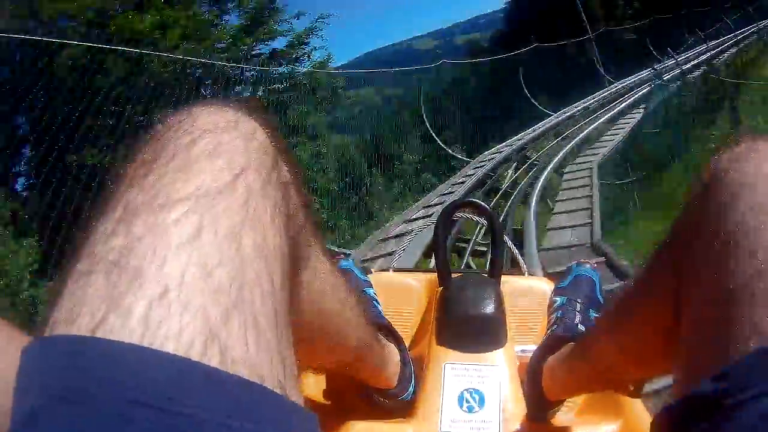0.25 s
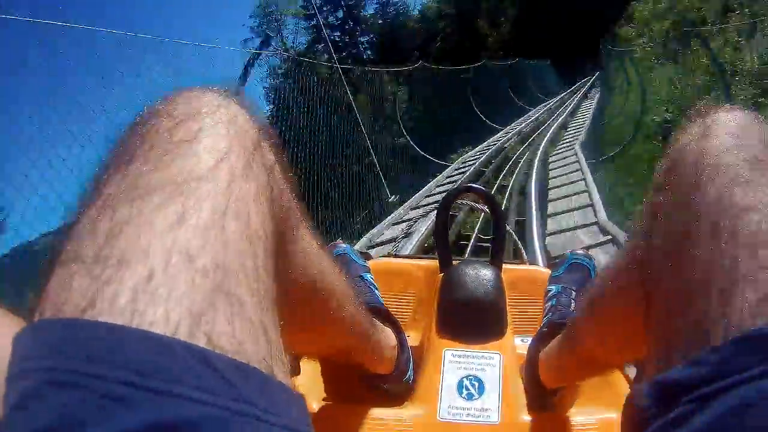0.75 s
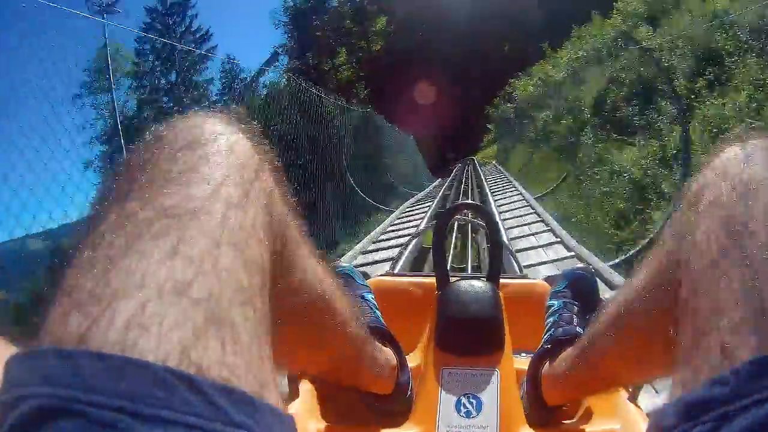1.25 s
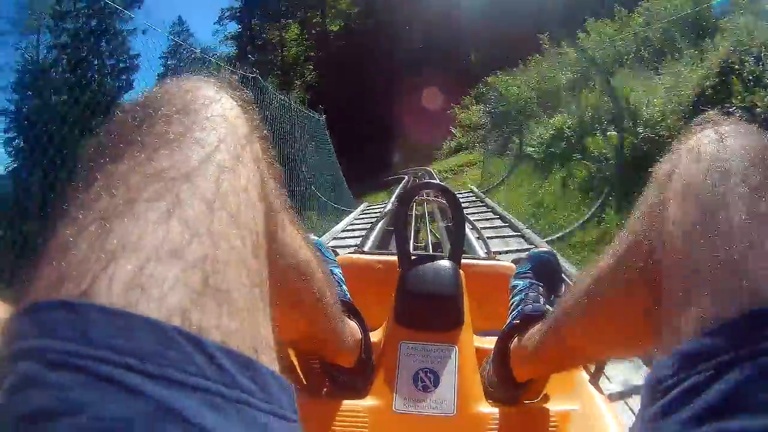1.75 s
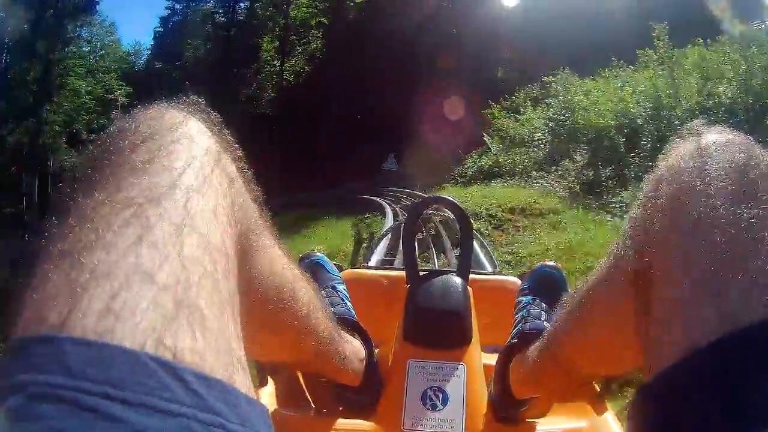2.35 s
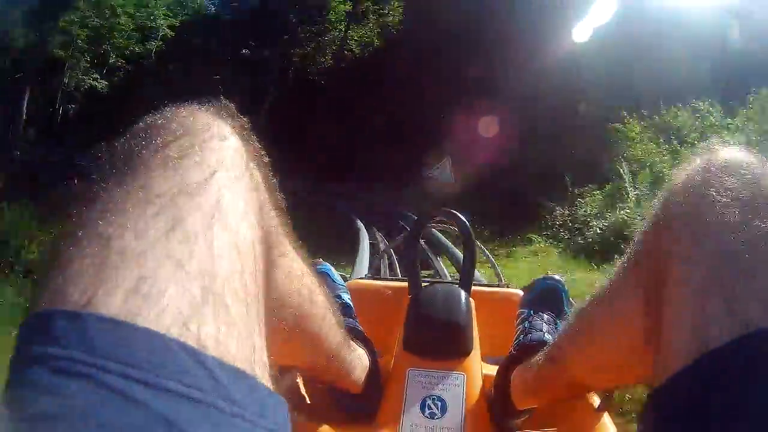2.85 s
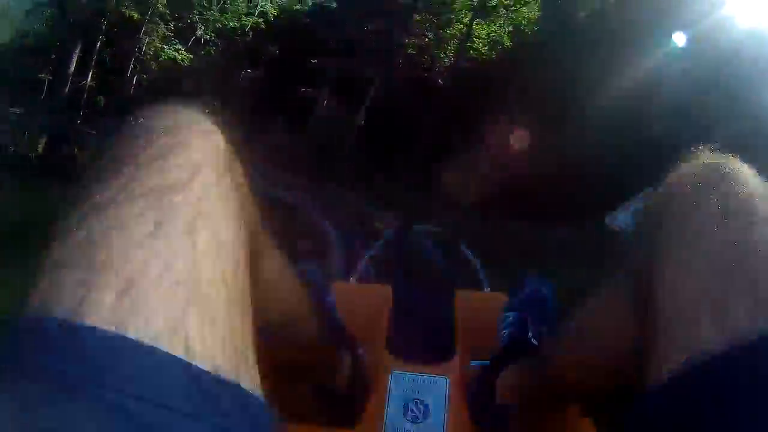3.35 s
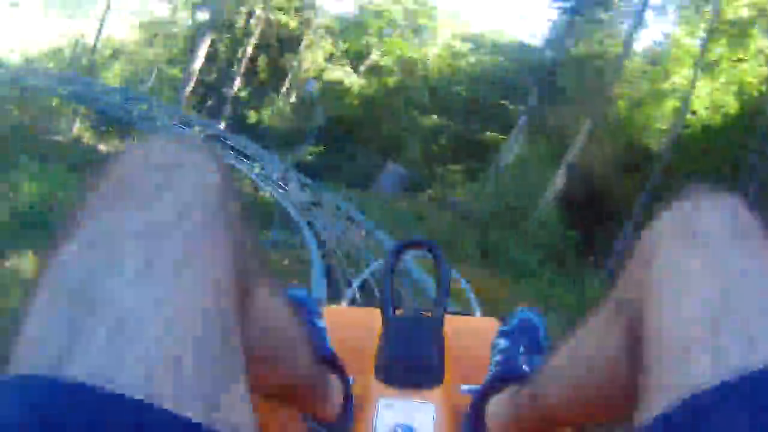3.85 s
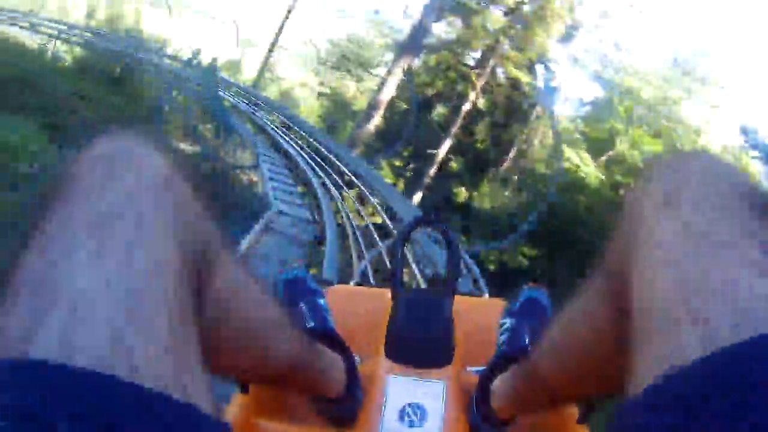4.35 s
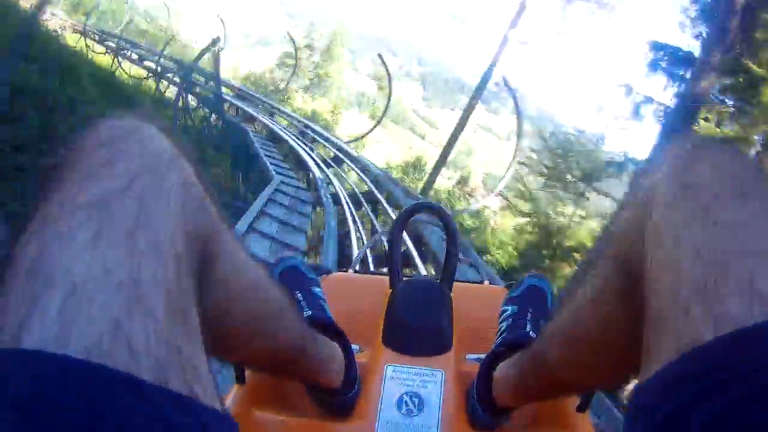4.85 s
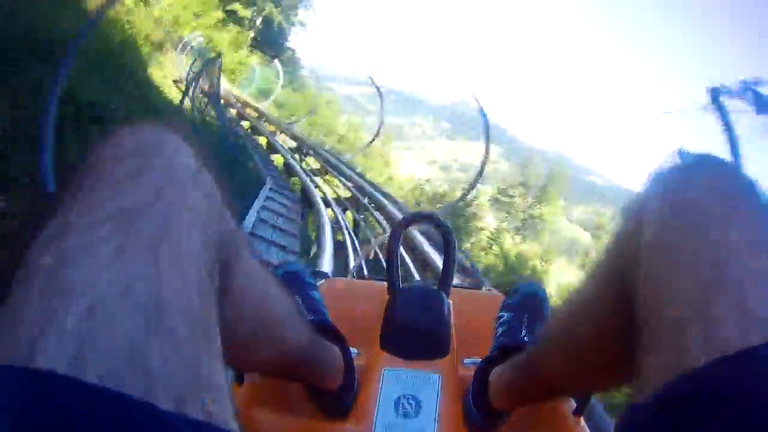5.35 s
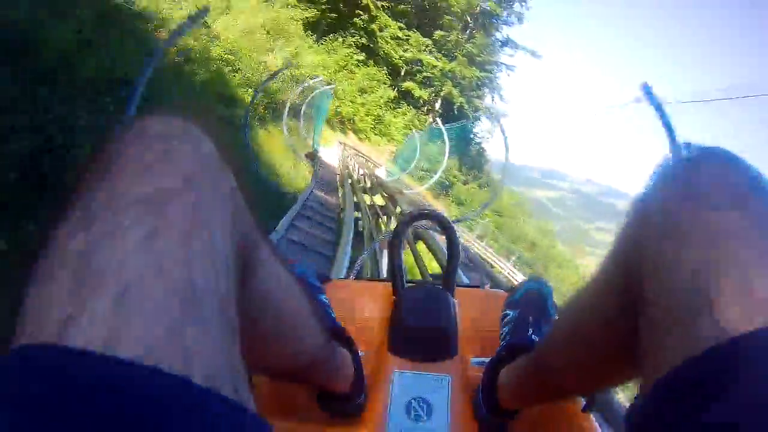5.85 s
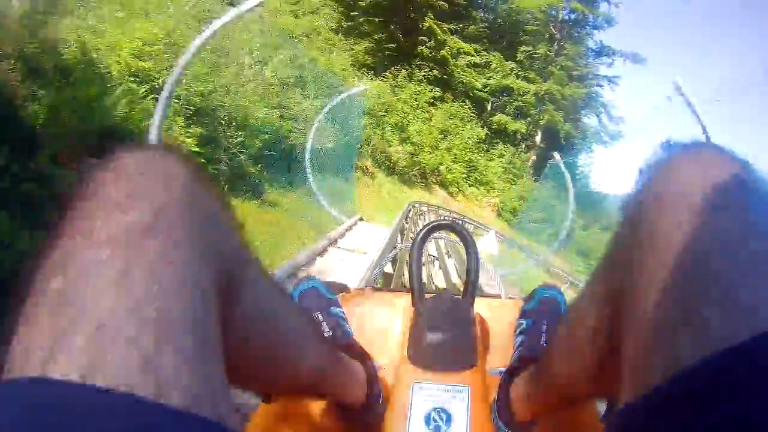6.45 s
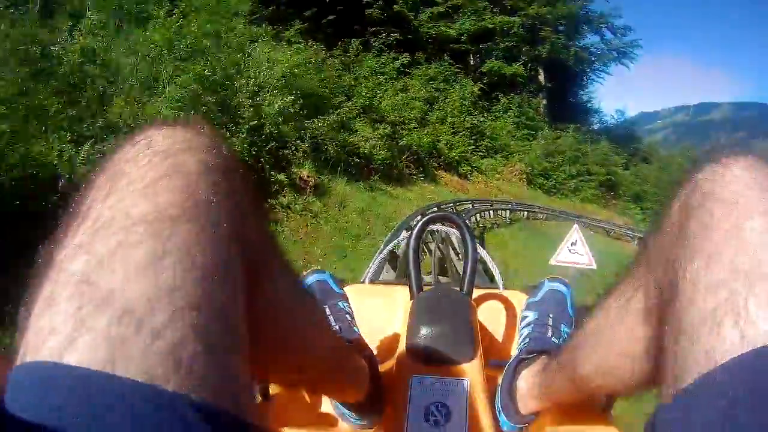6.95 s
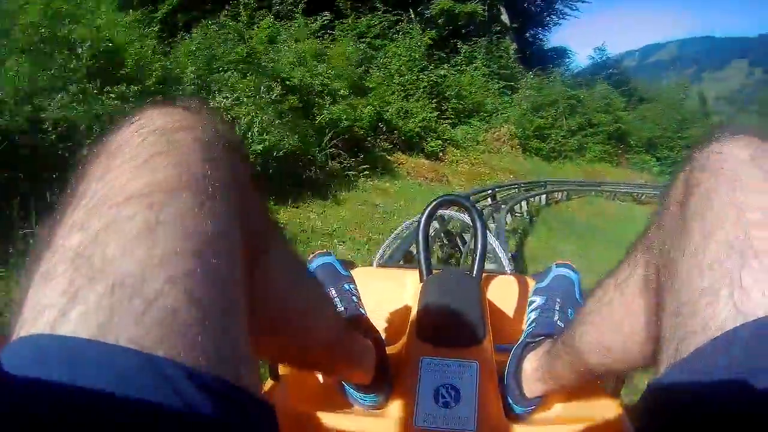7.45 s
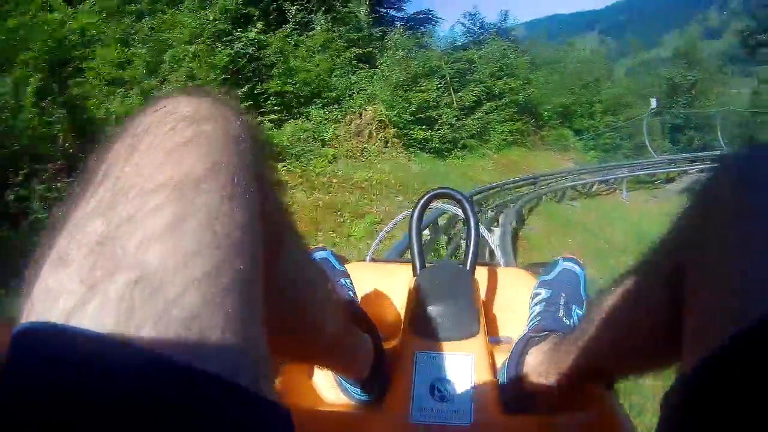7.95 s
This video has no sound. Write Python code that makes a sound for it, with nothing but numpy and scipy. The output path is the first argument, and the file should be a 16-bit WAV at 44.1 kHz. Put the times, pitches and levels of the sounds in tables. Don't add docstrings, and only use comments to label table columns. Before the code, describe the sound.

Continuous gritty wheel rumble with a nasal, hollow plastic resonance and faint singing tones. Early squeaks and a tiny whistle give way to violent clacks just after one second, with a sudden low hum. The middle is calmer and scraping, then clicks and ticks come in groups until a heavy knock at six seconds. Headwind thuds against the enclosed close microphone outdoors; the end is gentler, with soft scuffs and faint hum.

```python
import sys
import numpy as np
from scipy import signal
from scipy.fft import rfft, irfft, next_fast_len
from scipy.io import wavfile
from scipy.ndimage import uniform_filter1d, map_coordinates

SR = 44100
rng = np.random.default_rng(int(sys.argv[2]) if len(sys.argv) > 2 else 0)


def transcribe(u):
    v = np.clip(np.atleast_2d(u).T, -1, 1)
    q = np.round(v * 32767).astype(np.int16)
    wavfile.write(sys.argv[1], SR, q)


def invert_db(level):
    return 10 ** (np.asarray(level, dtype=float) / 20)


N = 361179

# (frequency [Hz], level [dB per Hz])
HISS_SPECTRUM = [(1470, -7.5), (2500, -6), (3560, -16), (4120, -13), (4800, -11), (5070, -11),
                 (11200, -14.5), (14600, -15.5), (15700, -22.5)]
HISS_DB = -66

# (time [s], load [dB])
WHEEL_LOAD = [(0, 10.5), (.3, 3.5), (.6, 1), (.9, -1.5), (1.2, 6), (1.65, 2), (2.0, -0.5), (2.4, .5),
              (2.75, 1.5), (3.2, -2.5), (3.6, -3.5), (4.0, -1), (4.7, 2), (5.4, 2), (5.9, -.5), (6.6, 0),
              (7.2, -2), (8.19, -0.5)]
# (time [s], extra load [dB], extra scrape [dB], half length [s])
ROUGH_SPOTS = [(0.142, 4, 4, 0.018), (0.623, 1, 3, 0.033), (1.122, 4.5, 4, 0.057), (1.215, 12, 5, 0.021),
               (1.437, -1.5, 6.5, 0.043), (1.69, 6, 6.5, 0.066), (1.807, 3, 4, 0.041),
               (2.546, 3, 0.5, 0.044), (2.797, 2, 4, 0.1), (3.36, 5.5, 2, 0.069), (3.703, 12, 9, 0.086),
               (4.283, 3, 1.5, 0.035), (5.328, 3.5, 2, 0.056), (5.903, 7.5, 2, 0.031), (6.067, 2, 3, 0.11),
               (6.632, 6, 4, 0.029), (6.773, 10, -1, 0.032), (7.41, -11, 9, 0.021), (7.721, 4.5, 6, 0.036),
               (8.15, 2.5, 0.5, 0.081)]
# (frequency [Hz], level [dB per Hz])
BODY_SPECTRUM = [(53, -20), (90, -2.5), (125, -11.5), (236, -12), (433, -14), (587, -19.5), (778, -17),
                 (896, -23), (1200, -21.5), (1560, -44), (2640, -120)]
# (frequency [Hz], width [Hz], level [dB])
ROLL_MODES = [(789, 33, -8), (1228, 315, -8.5), (1360, 60, 2.5), (1472, 103, -2), (1938, 260, -6.5),
              (2407, 210, -12)]
# (frequency [Hz], width [Hz], level [dB])
SCRAPE_MODES = [(2640, 490, 4.5), (3350, 1270, -0.5), (4150, 327, 4.5), (5140, 110, -6), (6020, 420, -8),
                (8040, 290, -14.5), (10800, 730, -11)]
BODY_DB, ROLL_DB, SCRAPE_DB = -48, -53.5, -64.5
BODY_DB_PER_DB, SCRAPE_DB_PER_DB = 0.46, 0.4
# (frequency [Hz], level at 0 dB load [dB], wander [share], flicker [dB])
SINGING_LINES = [(1351, -62.5, .012, 5.5), (1490, -63, .012, 2.5), (1900, -69.5, 0.018, 3),
                 (4230, -74.5, .022, 3.5)]

# (time [s], level [dB])
HEADWIND = [(0.0, -37), (0.11, -32), (0.2, -36.5), (0.64, -34), (0.98, -41), (1.09, -31), (1.41, -40),
            (1.8, -35), (1.85, -44.5), (3.58, -45), (3.74, -34), (3.88, -41), (5.36, -38), (5.43, -32),
            (5.61, -36.5), (6.07, -40.5), (6.2, -43), (8.19, -42.5)]
# (frequency [Hz], level [dB per Hz])
BUFFET_SPECTRUM = [(4, -9), (10, 0), (18, 0), (30, -8), (55, -12), (90, -20), (170, -29), (600, -100)]
WIND_DB_PER_JOLT_DB = 0.26
# (time [s], peak [dB], width [ms])
GUST_PUSHES = [(0.123, -14.5, 6.1), (.836, -26.5, 3), (1.041, -18.5, 4), (1.107, -16.5, 6.5),
               (2.541, -20.5, 0.64), (2.63, -31, 5.7), (4.08, -26, 1.2), (4.26, -23, 9.8),
               (5.441, -26, 2.3), (5.597, -25.5, 3), (6.682, -19.5, 3.9), (7.542, -27, 3.5),
               (7.739, -28, 3.6), (7.87, -33, 3.7), (8.069, -24, 4.9)]
# (time [s], peak [dB], width [ms])
GUST_SUCKS = [(0.313, -23, 3.9), (.347, -26.5, 4.4), (.532, -21.5, 3.1), (0.609, -17.5, 7.5),
              (0.64, -19, 6.3), (1.396, -19.5, 3.2), (1.463, -21, 2), (1.603, -23.5, 2.15), (1.699, -23, 2),
              (2.522, -24.5, 0.65), (3.057, -29, 5.6), (3.701, -21, 1.75), (3.976, -29.5, 3.5),
              (5.885, -26.5, 2.8), (6.738, -24.5, 2.3)]

# (time [s], peak [dB], bright part [dB], length [s])
MOUNT_SCUFFS = [(0.009, -28.5, -19, 0.015), (0.058, -31, -24, 0.015), (1.542, -40, -8.5, 0.016),
                (6.412, -39.5, -11, 0.023), (1.077, -29, -16, 0.011), (1.12, -29, -18, 0.016),
                (1.16, -21.5, -16.5, 0.013), (1.733, -44, -20, 0.022), (2.708, -41, -9, 0.036),
                (3.62, -35, -21, 0.025), (3.65, -36, -16, .02), (3.667, -35, -14, 0.02),
                (3.684, -34, -15, .014), (3.7, -30, -12.5, 0.023), (4.65, -39, -18, 0.026),
                (5.904, -36, -19, 0.047), (6.59, -34, -16, 0.015), (6.622, -36, -22, 0.018),
                (6.684, -34.5, -16.5, 0.017), (6.763, -34, -17, 0.016), (6.823, -34, -17, 0.032),
                (7.396, -36, -20, 0.03)]
# (time of top [s], frequency [Hz], top [dB], rise [s], fall [s])
SQUEAL_BURSTS = [
    (.065, 1395, -37, 0.045, 0.025),
    (.159, 1372, -43, 0.04, 0.024),
    (.215, 1420, -43, .03, 0.12),
    (.335, 1399, -46, 0.03, .015),
    (.03, 1380, -44, .04, .03),
    (7.498, 1470, -46, 0.02, 0.015),
]
SQUEAL_REST_DB = -70
# (time of top [s], frequency [Hz], top [dB], rise [s], fall [s])
FLANGE_WHISTLE = [
    (.31, 1038, -53, 0.032, 0.092),
    (.35, 1086, -56, .02, .02),
    (.364, 1040, -52, .02, .009),
]
# (time of top [s], frequency [Hz], top [dB], rise [s], fall [s])
HUM_SWELLS = [
    (1.386, 87.1, -30.5, 0.016, 0.097),
    (2.5, 82.4, -40.5, 1.2, 0.48),
    (4.436, 78, -41.5, 0.18, 0.21),
    (4.82, 79.8, -40.5, 0.13, 0.1),
    (6.03, 78.5, -42, 0.14, .1),
    (6.67, 77.2, -43.5, 0.81, .26),
    (7.04, 76, -45.5, 0.14, 0.17),
    (7.3, 77.1, -46, 0.097, 0.92),
    (8.19, 79.95, -42, 1.04, 0.28),
]
SWELL_DROP_DB = 12
# (time of top [s], frequency at top [Hz], top [dB], rise [s])
PORT_WHOOPS = [
    (3.58, 145, -46, .2),
    (6.7, 190, -50, .1),
    (7.54, 150, -47, .08),
]
WHOOP_OCTAVES_PER_S, WHOOP_FALL_S, WHOOP_RISE_DB, WHOOP_FALL_DB = 5.64, 0.059, 10, 10

# (frequency [Hz], level [dB], t60 [s])
THUMP_MODES = [(106, 4, 0.021), (200, 2, 0.016), (309, -10, 0.04)]
# (frequency [Hz], level [dB], t60 [s])
PANEL_MODES = [(495, -3, 0.012), (746, -1.5, 0.012), (940, 8.5, 0.0067)]
# (frequency [Hz], level [dB], t60 [s])
RING_MODES = [(1212, -4.5, 0.025), (1367, 6, 0.013), (1490, 1.5, 0.011)]
# (frequency [Hz], level [dB], t60 [s])
UPPER_MODES = [(1892, 1, 0.015), (2030, -6.5, 0.013), (2370, -12, 0.02)]
# (frequency [Hz], level [dB], t60 [s])
CRACK_MODES = [(2740, 1.5, 0.0061), (3344, -1.5, 0.0069), (3820, -1, 0.0091), (4310, 2, 0.0058),
               (5470, -8.5, 0.0055), (6500, -12.5, 0.0051), (7930, -20.5, 0.0049)]
# (time [s], peak [dB], weight [dB], brightness [dB])
RAPS = [
    (.338, -25.5, 0, 3),
    (.848, -27, 4, 2.5),
]
BUMPS = [
    (.451, -49, 5, -3),
    (1.461, -30.5, -1, -10),
    (1.758, -44, 10.5, -2),
    (2.521, -39, 4, 10.5),
    (6.735, -45, 3, -7),
]
BLOWS = [
    (1.209, 1.8, -3, 10),
    (1.7923, -9, 1, 5),
]
SLAMS = [
    (1.3031, -7, 0.38, 0.74),
    (6.0321, -8.5, -1, -0.75),
]
CLICKS = [
    (1.318, -32.5, -6, 6),
    (1.334, -45, -6, 0),
    (3.792, -31, 3.5, -1.5),
    (3.82, -48, 0, 1),
    (3.923, -51, 0, -2),
    (3.989, -41, -5, -5),
    (4.08, -37, 4, -7),
    (4.119, -50, -6, 2),
    (4.236, -48, -6, -1),
    (6.019, -37, 6, 1),
]
TICKS = [
    (2.54, -36, -3, 1.5),
    (3.752, -25, 3, 4.5),
    (3.757, -27.5, 8.5, -5),
    (4.758, -22.5, -1, 1),
    (5.283, -15, 0.5, 2.5),
    (5.421, -24.5, 3.5, 3),
    (5.556, -26, 3.5, 4.5),
    (5.972, -32, 11, -3.5),
]
TOCKS = [
    (4.775, -26, 3.5, 4.5),
    (5.324, -25, 3, 1),
    (5.463, -22.5, 1, -1),
    (6.027, -31, -4, -2.5),
    (6.068, -39, -10, -10),
]
# (thump [dB], panel [dB], upper ring [dB], crack [dB], brightness in upper ring [share])
RAP_RINGS = (-19, -20, -5.5, -31, -0.5)
BUMP_RINGS = (-6, -4.5, -21, -23, 1.27)
BLOW_RINGS = (-12.5, -21.5, -15, -28, 0.18)
SLAM_RINGS = (-11.5, -25, -11.5, -35, 2.8)
CLICK_RINGS = (-6, -14, -9, -7, 1.5)
TICK_RINGS = (-25.5, -15, -21, -11, 2.3)
TOCK_RINGS = (-10.5, -3, -1.5, -12.5, 0.44)
# (panel modes [dB], ring modes [dB], crack modes [dB])
BUMP_FAVOURS = ([1.7, 0.1, -2], [0.1, 0.1, 0.1], [0.1] * 7)
BLOW_FAVOURS = ([.1, 2.6, 1], [-4.5, 0.1, -1], [-4, 7.5, -4, -15, -6, -11, -11])
SLAM_FAVOURS = ([-4, 0.93, .1], [-8, 0.1, .1], [2, -20, 3, -6, 2, -9, -13])
CLICK_FAVOURS = ([.1, .1, .1], [-4, -3, 3], [3.5, 2, -2, -14, -11, -14, -18])
TICK_FAVOURS = ([-10, -1.2, 0.1], [-0.5, -4, 5.2], [-13, -0.5, -8, -8, 1, -5, 8])
TOCK_FAVOURS = ([4.4, -1, -10], [0.1, 2, -14], [3.5, 2.5, -11, 3, 0, 2, -11])
HARD_BLOW_DB = -12
HARD_RISE_S, LIGHT_RISE_S = 0.00039, 0.00033
HARD_DAMPING, HARD_GAIN_DB = 0.68, 4
# (frequency [Hz], level [dB], t60 [s])
LID_MODES = [(574, -12.5, 0.055), (780, -16, 0.068), (1241, -2, 0.072), (1895, -12, .07),
             (2420, -19, 0.045), (2820, -14, .03)]
# (time [s], level [dB])
LID_RINGS = [
    (1.21, -17.5),
    (1.304, -25),
    (1.793, -24.5),
    (6.033, -29),
]
REBOUND_HZ, REBOUND_DB, REBOUND_T60_S = 160, 1.5, 0.039

# (start [s], end [s])
TREBLE_GAPS = [(.318, .346), (.83, .859), (1.151, 1.21), (1.278, 1.306), (1.791, 1.818), (3.743, 3.771),
               (4.734, 4.795), (5.279, 5.338), (5.406, 5.466), (5.534, 5.562), (5.95, 6.035)]
# (frequency [Hz], threshold [spreads])
TREBLE_DROPOUTS = [(9000, 3.2), (12200, 2.3), (12600, .9), (15400, 1.05), (15750, .2)]


def unit(x):
    return x / np.sqrt(np.mean(x ** 2) + 1e-20)


def curves(rows):
    time_s, *columns = np.transpose(rows)
    return [np.interp(np.arange(N) / SR, time_s, column) for column in columns]


def wobble(rate_hz):
    knots = rng.standard_normal(int(N * rate_hz / SR) + 4)
    return map_coordinates(knots, [np.arange(N) * rate_hz / SR])


def filtered(x, response):
    size = next_fast_len(N + SR // 2)
    hz = np.fft.rfftfreq(size, 1 / SR)
    return irfft(rfft(x, size) * response(hz), size)[:N]


def colour(points):
    point_hz, level_db = np.transpose(points)
    return lambda hz: invert_db(np.interp(np.log(hz + 1), np.log(point_hz + 1), level_db))


def resonances(modes, hz):
    total = 0
    for k, (centre_hz, width_hz, db) in enumerate(modes):
        loss = 1j * hz * width_hz
        total = total + (-1) ** k * invert_db(db) * loss / (centre_hz ** 2 - hz ** 2 + loss)
    return total


def roll_response(hz):
    return resonances(ROLL_MODES, hz) / (1 + (hz / 2700) ** 6)


def scrape_response(hz, top_order):
    low_loss = 1 + (2300 / (hz + 1)) ** 4
    high_loss = 1 + (hz / 12000) ** top_order
    return resonances(SCRAPE_MODES, hz) / low_loss / high_loss


def rough(patchy_db, flutter_db, rate_hz):
    spectra = signal.stft(rng.standard_normal(N), nperseg=512)[2]
    across_hz = uniform_filter1d(rng.standard_normal(spectra.shape), 5, 0)
    patches = unit(uniform_filter1d(across_hz, 8, 1))
    noise = signal.istft(spectra * invert_db(patchy_db * patches), nperseg=512)[1][:N]
    return noise * invert_db(flutter_db * wobble(rate_hz))


def jolts():
    spot_s, load_db, scrape_db, half_s = np.transpose(ROUGH_SPOTS)
    t = np.arange(0, N, 256) / SR
    bell = np.exp(-((t[:, None] - spot_s) / half_s) ** 2)
    return curves(np.c_[t, bell @ load_db, bell @ scrape_db])


def swells(rows, rest_db=-90):
    top_s, hz, db, rise_s, fall_s = np.transpose(sorted(rows))
    t = np.arange(0, N, 128) / SR
    since_s = t[:, None] - top_s
    distance = np.where(since_s < 0, -since_s / rise_s, since_s / fall_s)
    level_db = (db - SWELL_DROP_DB * distance).max(axis=1)
    return [np.c_[t, np.interp(t, top_s, hz), np.maximum(level_db, rest_db)]]


def tone(tables, waver, rate_hz, flutter_db):
    out, drift, flutter = np.zeros(N), wobble(rate_hz), wobble(rate_hz)
    for rows in tables:
        s, hz, db = np.transpose(rows)
        first = int(max(s[0] - 0.01, 0) * SR)
        last = min(int((s[-1] + 0.005) * SR), N)
        i = np.arange(first, last)
        fade = np.clip(np.minimum(i - i[0], i[-1] - i) / (0.016 * SR), 0, 1)
        pitch_hz = np.interp(i / SR, s, hz) * (1 + waver * drift[i])
        level = invert_db(np.interp(i / SR, s, db) + flutter_db * flutter[i])
        out[i] += np.sqrt(2) * fade * level * np.sin(2 * np.pi * np.cumsum(pitch_hz) / SR)
    return out


def hiss():
    noise = rough(patchy_db=0.2, flutter_db=0.1, rate_hz=20)
    return invert_db(HISS_DB) * unit(filtered(noise, colour(HISS_SPECTRUM)))


def wheels():
    extra_db, bright_db = jolts()
    load_db = curves(WHEEL_LOAD)[0] + extra_db
    body_db = BODY_DB + BODY_DB_PER_DB * load_db
    roll_db = ROLL_DB + load_db
    scrape_db = SCRAPE_DB + SCRAPE_DB_PER_DB * load_db + bright_db
    jitter = wobble(40)
    body = filtered(rough(patchy_db=0.67, flutter_db=1.5, rate_hz=48), colour(BODY_SPECTRUM))
    roll = filtered(rough(patchy_db=1.23, flutter_db=1.75, rate_hz=70), roll_response)
    scrape = filtered(rough(patchy_db=0.8, flutter_db=1.3, rate_hz=90), lambda hz: scrape_response(hz, 8))
    return (invert_db(body_db - 0.6 + 0.9 * jitter) * unit(body)
            + invert_db(roll_db - 0.4 + 1.2 * jitter) * unit(roll)
            + invert_db(scrape_db - 1.5 + 1.2 * jitter) * unit(scrape))


def singing():
    load_db = curves(WHEEL_LOAD)[0] + jolts()[0]
    out = np.zeros(N)
    for hz, db, wander, flicker_db in SINGING_LINES:
        pitch_hz = hz * (1 + wander * wobble(7) + 0.00695 * wobble(120))
        level_db = db + 0.32 * load_db + flicker_db * wobble(14) + 2.9 * wobble(90)
        out += invert_db(level_db) * np.sin(2 * np.pi * np.cumsum(pitch_hz) / SR)
    return out


def wind():
    gust_db = curves(HEADWIND)[0] + WIND_DB_PER_JOLT_DB * jolts()[0]
    lumps = filtered(rough(patchy_db=2.0, flutter_db=1.5, rate_hz=29), colour(BUFFET_SPECTRUM))
    power = uniform_filter1d(uniform_filter1d(lumps ** 2, size=SR // 4), size=SR // 4)
    return invert_db(gust_db + 1.1) * lumps / np.sqrt(np.abs(power) + 1e-12)


def scuffs():
    dull, bright, t = np.zeros(N + SR), np.zeros(N + SR), np.arange(SR // 8) / SR
    for s, db, bright_db, length_s in MOUNT_SCUFFS:
        swell = (1 - np.exp(-t / 0.0015)) * np.exp(-(t / length_s) ** 2)
        start = round(s * SR)
        dull[start:][:len(t)] += invert_db(db - 8.5) * swell
        bright[start:][:len(t)] += invert_db(db + bright_db - 4.0) * swell
    grit = rng.standard_normal(N) * invert_db(3 * wobble(300))
    ring = filtered(grit, roll_response)
    rasp = filtered(grit, lambda hz: scrape_response(hz, 6))
    return dull[:N] * unit(ring) + bright[:N] * unit(rasp)


def squeal():
    return tone(swells(SQUEAL_BURSTS, SQUEAL_REST_DB), waver=0.014, rate_hz=70, flutter_db=3.0)


def gust_pops():
    half = SR // 40
    pops, ms = np.zeros(N + SR), np.arange(-half, half) * 1000 / SR
    for sign, rows in [(1, GUST_PUSHES), (-1.06, GUST_SUCKS)]:
        for s, db, width_ms in rows:
            u = ms / width_ms
            pulse = 1.42 * np.exp(-2.8 * u ** 2) - 0.57 * np.exp(-0.33 * u ** 2)
            pops[round(s * SR) - half:][:len(ms)] += sign * invert_db(db - 2.0) * pulse
    return pops[:N]


def whistle():
    return tone(swells(FLANGE_WHISTLE), waver=0.005, rate_hz=22.0, flutter_db=-3.0)


def strikes():
    places = [(RAPS, RAP_RINGS, BUMP_FAVOURS, -1), (BUMPS, BUMP_RINGS, BUMP_FAVOURS, 1),
              (BLOWS, BLOW_RINGS, BLOW_FAVOURS, -1), (SLAMS, SLAM_RINGS, SLAM_FAVOURS, -1),
              (CLICKS, CLICK_RINGS, CLICK_FAVOURS, 1), (TICKS, TICK_RINGS, TICK_FAVOURS, -1),
              (TOCKS, TOCK_RINGS, TOCK_FAVOURS, 1)]
    out = []
    for rows, (thump, panel, upper, crack, share), (low, mid, high), side in places:
        for s, db, weight, bright in rows:
            panel_db = [panel + weight + favour for favour in low]
            upper_db = [upper + share * bright] * len(UPPER_MODES)
            crack_db = [crack + bright + favour for favour in high]
            out.append((s, db, side, thump + weight, panel_db, mid, upper_db, crack_db))
    return sorted(out)


def clacks():
    out, t = np.zeros(N + SR), np.arange(SR // 10) / SR
    for s, db, side, thump_db, panel_db, ring_db, upper_db, crack_db in strikes():
        hard = db > HARD_BLOW_DB
        groups = [(PANEL_MODES, 10, panel_db, hard), (RING_MODES, -4, ring_db, hard),
                  (UPPER_MODES, 8.5, upper_db, hard), (CRACK_MODES, 11.5, crack_db, False)]
        blow = np.zeros(len(t))
        for modes, gain_db, drives_db, pressed in groups:
            damping, hard_db = (HARD_DAMPING, HARD_GAIN_DB) if pressed else (1, 0)
            for (hz, mode_db, t60_s), drive_db in zip(modes, drives_db):
                detune = 1 + 0.008 * rng.standard_normal()
                decay_db = 60 * t / t60_s / damping
                level = invert_db(hard_db + gain_db + drive_db + mode_db - decay_db)
                blow += side * level * np.sin(2 * np.pi * hz * detune * t)
        rattle = 0.03 * rng.standard_normal(size=600) * invert_db(-60 * t[:600] / 0.03)
        rattle[0] = 1
        contact = (1 - np.exp(-t / (HARD_RISE_S if hard else LIGHT_RISE_S))) ** 2
        blow = signal.fftconvolve(blow * contact, rattle)[:len(t)]
        for hz, mode_db, t60_s in THUMP_MODES:
            level = invert_db(thump_db + 4.5 + mode_db - 60 * t / t60_s)
            blow += level * np.sin(2 * np.pi * hz * t) * (1 - np.exp(-t / 0.00066))
        out[round((s + 0.0007) * SR):][:len(t)] += invert_db(db) * blow
    return out[:N]


def lid():
    out, t = np.zeros(N + SR), np.arange(SR // 8) / SR
    ring = np.zeros(len(t))
    for hz, db, t60_s in LID_MODES:
        ring += invert_db(db - 60 * t / t60_s) * np.sin(2 * np.pi * hz * t)
    ring *= 1 - np.exp(-t / 0.0012)
    ring -= invert_db(REBOUND_DB - 60 * t / REBOUND_T60_S) * np.sin(2 * np.pi * REBOUND_HZ * t)
    for s, db in LID_RINGS:
        out[round(s * SR):][:len(t)] -= invert_db(db) * ring
    return out[:N]


def hum():
    return tone(swells(HUM_SWELLS), waver=0.022, rate_hz=18, flutter_db=1.6)


def whoop():
    tables = []
    for s, hz, db, rise_s in PORT_WHOOPS:
        steps = [(-rise_s, WHOOP_RISE_DB), (-rise_s / 2, WHOOP_RISE_DB / 2), (0, 0),
                 (WHOOP_FALL_S, WHOOP_FALL_DB)]
        tables.append([(s + d, hz * 2 ** (WHOOP_OCTAVES_PER_S * d), db - loss_db) for d, loss_db in steps])
    return tone(tables, waver=0.083, rate_hz=24, flutter_db=2)


def scene():
    rolling = hiss() + wheels() + singing() + squeal() + whistle() + hum()
    port = wind() + gust_pops() + whoop()
    housing = scuffs() + clacks() + lid()
    return (rolling + port + housing)[None]


def thin_treble(x):
    t = np.arange(N) / SR
    gap = sum(np.clip(np.minimum(t - start, end - t) / 0.0027 + 1, 0, 1) for start, end in TREBLE_GAPS)
    x = x - gap * filtered(x, lambda hz: hz > 8650)
    hz, _, spectra = signal.stft(x, SR, nperseg=2048, noverlap=1024)
    bins, frames = spectra.shape
    bands = unit(uniform_filter1d(rng.standard_normal((bins // 12 + 1, frames)), 2, 1))
    field = np.repeat(bands, 12, axis=0)[:bins]
    threshold = np.interp(hz, *np.transpose(TREBLE_DROPOUTS))
    keep = (field < threshold[:, None]) * (hz[:, None] < 15780)
    return signal.istft(spectra * keep, SR, nperseg=2048, noverlap=1024)[1][:N]


def band_limit(x):
    return signal.sosfilt(signal.butter(12, 15810, fs=SR, output="sos"), x)


def record(dry):
    soft = dry[0] / (1 + np.abs(dry[0] / 0.72) ** 4) ** (1 / 4)
    mix = thin_treble(soft)[None]
    return band_limit(mix)


dry = scene()
out = record(dry)
transcribe(out)
```